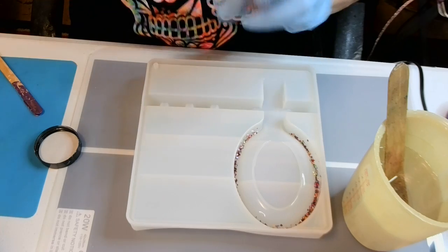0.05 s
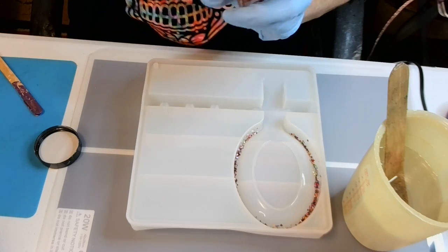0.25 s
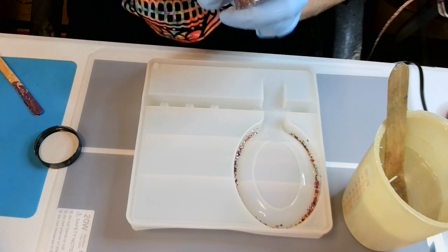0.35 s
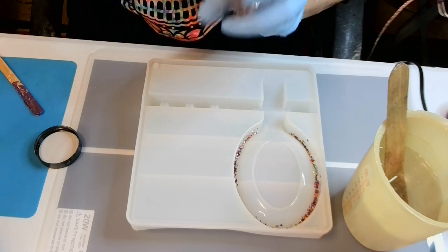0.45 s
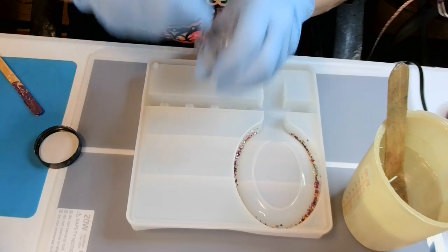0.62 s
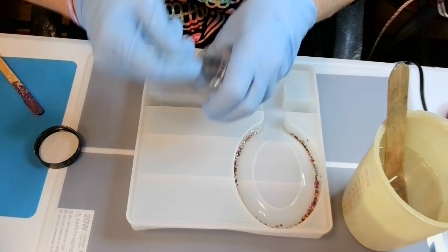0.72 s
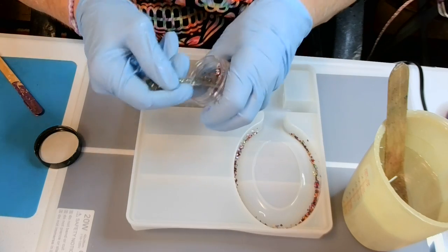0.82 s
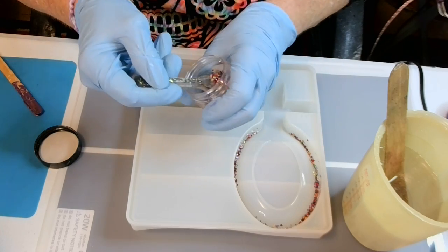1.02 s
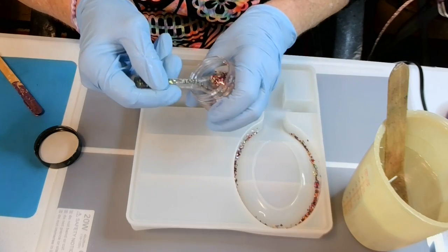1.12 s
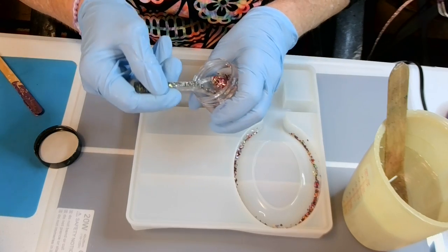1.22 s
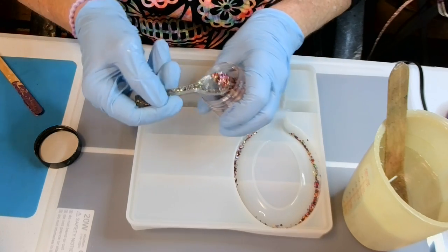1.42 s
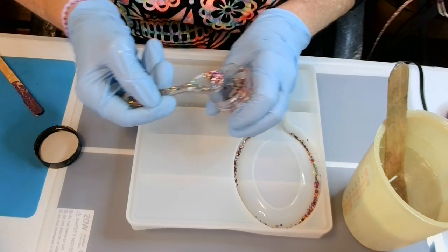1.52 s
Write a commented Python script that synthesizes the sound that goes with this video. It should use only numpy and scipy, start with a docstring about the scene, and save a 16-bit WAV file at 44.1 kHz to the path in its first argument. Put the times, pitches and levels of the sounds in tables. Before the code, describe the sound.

Two sharp spoon knocks on a jar, followed by crushed glass lightly scraping and ticking.

```python
"""A quiet humming room, the microphone close to a hand-held jar of crushed glass. A small spoon knocks
twice on the jar, setting its cavity and wall ringing, loud enough to overload the microphone. Then it
stirs: countless tiny collisions make a gritty scrape, single pieces tick, one rattles on the spoon,
and a last scoop slides up the wall. Hands bump softly on the table."""
import sys
import numpy as np
from scipy import signal
from scipy.fft import rfft, irfft
from scipy.io import wavfile
from scipy.ndimage import uniform_filter1d

SR = 44100
rng = np.random.default_rng(int(sys.argv[2]) if len(sys.argv) > 2 else 0)


def digitize_waveform(pressure):
    """Quantize a signal to 16-bit integers and store it at the path in sys.argv[1].

    Rows of a 2-D input are taken as channels; values are limited to [-1, 1].
    """
    field = np.atleast_2d(pressure).T
    bounded = np.clip(field, -1, 1)
    quanta = np.round(bounded * 32767).astype(np.int16)
    wavfile.write(sys.argv[1], SR, quanta)


N = 68355


def amp(db):
    return 10 ** (np.asarray(db) / 20)


def unit_rms(x):
    return x / np.sqrt(np.mean(x ** 2) + 1e-20)


def rise(t, rise_s):
    return np.sin(np.pi / 2 * np.minimum(t / rise_s, 1)) ** 2


def curve(rows, column):
    """One column of a timed table, sample by sample."""
    rows = np.array(rows)
    return np.interp(np.arange(N) / SR, rows[:, 0], rows[:, column])


def colour(x, spectrum):
    """Shapes a sound by (freq_hz, level_db) points, at unit RMS."""
    hz, db = np.transpose(spectrum)
    bins_hz = np.fft.rfftfreq(len(x), 1 / SR)
    gain = amp(np.interp(np.log(bins_hz + 1), np.log(hz + 1), db))
    return unit_rms(irfft(rfft(x) * gain, len(x)))


def add(mix, start_s, sound):
    part = mix[round(start_s * SR):][:len(sound)]
    part += sound[:len(part)]


def resonate(x, hz, width_hz):
    """A resonance of gain 1 whose pitch may move."""
    turn = np.exp(2j * np.pi * np.cumsum(hz * np.ones(len(x))) / SR)
    pole = np.exp(-np.pi * width_hz / SR)
    return 2 * (turn * signal.lfilter([1 - pole], [1, -pole], x / turn)).real


def band(x, hz, width_hz):
    """A steep resonance, at unit RMS."""
    return unit_rms(resonate(resonate(x, hz, width_hz), hz, width_hz))


def ring(t, hz, db, t60_s):
    """One struck mode: a dying sine."""
    return amp(db - 60 * t / t60_s) * np.sin(2 * np.pi * hz * t)


def jar_knocks():
    """Each blow of the spoon is a hollow pop that sets the jar ringing, with a crack of shaken glass."""
    # blows and rebounds: start_s, strength_db, pitch_hz, bright_db, click_db, width_hz, glide_hz_per_s
    blows = [(0.2326, -41, 1390, 3, 4, 300, 0), (0.243, -2, 1460, 5, -25.5, 160.4, 1000),
             (0.2497, -4.5, 1420, 4.5, -25.5, 232, 14998.5), (0.3594, 1, 1370, 6, -25, 205, 42000),
             (0.3700, -6, 1530, 7.5, -25.5, 330, 1000.5), (0.3952, -23, 1420, 17.5, 3, 300, 0.5),
             (.532, -37.5, 1470, 18, 1, 300, 0)]
    out, t = np.zeros(N), np.arange(SR // 3) / SR
    cavity = signal.butter(N=3, Wn=[1000, 1850], btype="band", fs=SR, output="sos")
    for start_s, db, hz, bright_db, click_db, width_hz, glide in blows:
        noise = rng.standard_normal(len(t))
        attack = rise(t, 0.0024)
        age = np.pi * width_hz * t
        pulse = (np.e * age * np.exp(-age) / 2) ** 2 * age
        pop = amp(20) * attack * pulse * np.sin(2 * np.pi * (hz + glide * t / 2) * t)
        end_hz = hz + glide / width_hz  # pitch at which the blow lets go
        # dense hollow tail of the gloved jar
        clack = amp(-20 - 60 * t / 0.24) * band(noise[::-1], end_hz, 250) * rise(t, 0.013)
        hollow = signal.sosfilt(cavity, pop + clack)
        wall = amp(-12) * attack * jar_ring(t, end_hz, bright_db)
        crack = amp(-27.5 + bright_db - 60 * t / 0.074) * rise(t, 0.01)
        click = amp(click_db - 60 * t / 0.022)
        snap = (crack + click) * band(noise, 3400, 3000) * rise(t, 0.00068)
        # brief inaudible offset in the microphone signal after each knock
        offset = amp(-45) * np.sin(np.pi * np.minimum(t / 0.096, 1))
        add(out, start_s, amp(db) * (hollow + wall + snap + offset))
    return out


def jar_ring(t, blow_hz, bright_db):
    """The jar's low modes answer most near the blow's pitch; the upper ones follow its brightness."""
    # modes of the jar: pitch_hz, level_db, t60_s
    modes = [(1178, -10.5, .16), (1280.6, -3.5, 0.24), (1358.5, 3.5, 0.14), (1422, 3.5, 0.14),
             (1556.2, 5.5, 0.23), (1690, -16.5, 0.13), (2235, -31, 0.083), (2503, -21, 0.1),
             (2764, -18.5, 0.073), (3226, -21.5, 0.11), (3340, -18.5, 0.14), (4350, -23, 0.087)]
    out = np.zeros(len(t))
    for k, (hz, db, t60_s) in enumerate(modes):
        drive_db = bright_db if hz > 2000 else -40 * abs(np.log2(hz / blow_hz))
        out += (-1) ** k * ring(t, hz, db + drive_db, t60_s)
    return out


def grit(hits_per_s=6000, spread_db=2.5, clump_db=2.5):
    """Dense tiny collisions of glass, uneven in size and swelling in clumps."""
    size = amp(spread_db * np.minimum(rng.exponential(1, N), 4)) * rng.standard_normal(N)
    clumps = unit_rms(uniform_filter1d(uniform_filter1d(rng.standard_normal(N), 200), 200))
    hits = rng.random(N) < hits_per_s / SR
    return unit_rms(size * hits) * amp(clump_db * clumps)


def stir():
    """Loose grit hisses widely; the spoon scraping through it rings in a few bands, the top one moving."""
    # course of the stirring: time_s, loose_db, scrape_db, top_db, top_hz
    course = [(.1, -91, -77, -78.5, 6000), (.15, -57, -62, -57.5, 6150), (.3, -60, -58, -70, 6460),
              (.47, -58.5, -48, -80, 6000), (.51, -39, -44, -41, 6550), (.535, -44, -72, -40.5, 6570),
              (.56, -58, -51, -61, 6700), (.598, -58, -75, -83, 6600), (.612, -42.5, -48.5, -59, 6500),
              (.645, -53, -58, -56, 6030), (.735, -49.5, -70, -55, 5920), (.765, -46, -45, -44, 5950),
              (.82, -71.5, -46.5, -51, 5970), (.87, -52.5, -49, -51.5, 6150), (.915, -64, -57.5, -57, 6150),
              (.99, -59.5, -52, -44.5, 6200), (1.06, -56.5, -55, -65.5, 6340),
              (1.115, -57.5, -62, -67, 6610)]
    # resonances of the scrape: pitch_hz, width_hz, level_db
    scrape_rings = [(1320, 310, -13.5), (3880, 370, -4), (4650, 140, 0)]
    # spectrum of loose grit: freq_hz, level_db
    loose_spectrum = [(530, -67), (900, -23), (1510, -3.5), (1920, -32), (2230, -18), (4370, -11),
                      (4750, -6), (6750, -11), (8200, -11), (10700, -50), (18000, -120)]
    grains, t = grit(), np.arange(N) / SR
    loose_db, scrape_db, top_db, top_hz = (curve(course, column) for column in (1, 2, 3, 4))
    loose = colour(grit(), loose_spectrum)
    scrape = unit_rms(sum(amp(db) * band(grains, hz, width_hz) for hz, width_hz, db in scrape_rings))
    top = band(grains, top_hz, width_hz=600)
    inside_s = np.minimum(t - course[0][0], course[-1][0] - t)
    fade = np.clip(inside_s / 0.092 + 1, 0, 1)
    return fade * (amp(loose_db) * loose + amp(scrape_db) * scrape + amp(top_db) * top)


def glass_ticks():
    """Single pieces of glass tick: a short ping, each with a dry snap."""
    # ticking pieces: start_s, level_db, pitch_hz, t60_s, snap_db
    ticks = [(.6047, -26.5, 6500, 0.0097, -4.5), (.666, -20, 5850, 0.011, -5),
             (.718, -24, 5790, 0.028, -10.5), (0.745, -24.5, 5910, 0.023, -8),
             (0.8432, -19, 5840, 0.014, -5), (0.936, -30, 5640, 0.017, -0.5),
             (.9838, -34, 6260, 0.021, 0.5), (1.2033, -30, 5060, 0.0092, -3)]
    out, t = np.zeros(N), np.arange(2000) / SR
    for start_s, db, hz, t60_s, snap_db in ticks:
        ping = ring(t, hz, 0, t60_s) * rise(t, 0.0015)
        noise = band(rng.standard_normal(len(t)), 4170, 2220)
        snap = amp(snap_db - 60 * t / 0.016) * rise(t, 0.0022) * noise / 2
        add(out, start_s, amp(db) * (ping + snap))
    return out


def spoon_rattle():
    """A piece bounces on the spoon, each bounce ringing the same damped modes."""
    # bounces of the piece: start_s, level_db
    bounces = [(1.1284, -18), (1.1295, -10.5), (1.1322, -19), (1.1369, -17.5), (1.1406, -16), (1.1467, -24)]
    # modes rung by each bounce: pitch_hz, level_db, t60_s
    modes = [(880, -21, 0.08), (1130, -26.5, 0.061), (1964, -29, 0.045), (4075, -0.5, 0.0084),
             (4616, -2, 0.008), (4836, 3, 0.0069)]
    out, t = np.zeros(N), np.arange(6000) / SR
    tap = sum(ring(t, *mode) for mode in modes) * rise(t, 0.0011)
    for start_s, db in bounces:
        add(out, start_s, amp(db) * tap)
    return out


def scoop():
    """The spoon slides up the wall of the jar with a thin rising ring."""
    # course of the slide: time_s, level_db, pitch_hz
    course = [(1.4, -80.5, 2080), (1.468, -52, 2200), (1.55, -44.5, 2310)]
    # steady resonances of the slide: pitch_hz, width_hz, level_db
    rings = [(3306, 290, -5.5), (3670, 300, -6.5)]
    friction = grit() + rng.standard_normal(N)
    steady = sum(amp(db) * band(friction, hz, width_hz) for hz, width_hz, db in rings)
    rising = band(friction, curve(course, 2), width_hz=160)
    fade = np.clip((np.arange(N) / SR - course[0][0]) / 0.027, 0, 1)
    return fade * amp(curve(course, 1)) * unit_rms(steady + rising)


def table_bumps(swell_s=0.019):
    """Hands send soft low thumps through the table."""
    # thumps: start_s, level_db, pitch_hz
    thumps = [(0.459, -59, 204), (0.531, -65, 83.3), (0.718, -60, 77.4), (1.15, -53.5, 95)]
    out, t = np.zeros(N), np.arange(SR // 4) / SR
    envelope = np.e * t / swell_s * np.exp(-t / swell_s)
    for start_s, db, hz in thumps:
        add(out, start_s, amp(db) * envelope * np.sin(2 * np.pi * hz * t))
    return out


def with_echo(x, echo_db=-16.5, t60_s=0.24):
    """The direct sound plus a short tail from the table and walls."""
    t = np.arange(SR // 3) / SR
    tail = rng.standard_normal(len(t)) * amp(-60 * t / t60_s) * (t > 0.003)
    return x + amp(echo_db) * signal.fftconvolve(x, tail / np.linalg.norm(tail))[:N]


def room_tone():
    """Steady air noise with a few thin wavering whines, the deepest rumble cut."""
    # spectrum of the room's air: freq_hz, level_db
    air_spectrum = [(15, -59), (25, -17), (199, -6.5), (256, -11.5), (338, -4.5), (457, -8.5), (519, -12),
                    (685, -17), (1080, -15), (1430, -15.5), (3630, -23), (5170, -11), (6020, -34),
                    (10500, -35.5), (13600, -70.5), (22000, -120)]
    # whines and hums: pitch_hz, level_db
    tones = [(5150, -62.5), (7580, -81), (924, -66.5), (348, -65), (690, -67.5)]
    air = amp(-57) * colour(rng.standard_normal(N), air_spectrum)
    whines = sum(amp(db) * unit_rms(resonate(rng.standard_normal(N), hz, 23)) for hz, db in tones)
    low_cut = signal.butter(N=2, Wn=20, btype="high", fs=SR, output="sos")
    return signal.sosfilt(low_cut, air + whines)


def scene(mic_top_hz=8630):
    """Mono: the jar up close, its top treble lost at the microphone, over the room and the table."""
    close = with_echo(jar_knocks() + glass_ticks() + spoon_rattle()) + stir() + scoop()
    high_cut = signal.cheby2(N=10, rs=40, Wn=mic_top_hz, fs=SR, output="sos")
    return (signal.sosfilt(high_cut, close) + room_tone() + table_bumps())[None]


def record(dry):
    """The microphone overloads hard on the knocks; a band limit follows."""
    ceiling, edge_hz = 0.7, 16200
    band_limit = signal.firwin(511, edge_hz, window=("kaiser", 9), fs=SR)
    return signal.oaconvolve(np.clip(dry, -ceiling, ceiling), band_limit[None], "same")


dry = scene()
out = record(dry)
digitize_waveform(out)
```